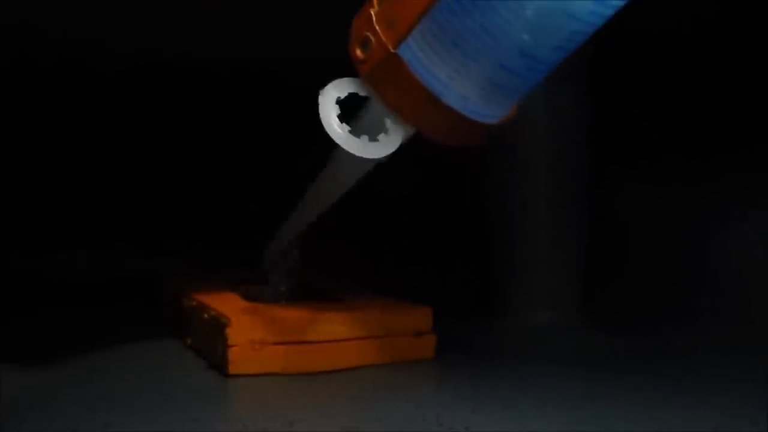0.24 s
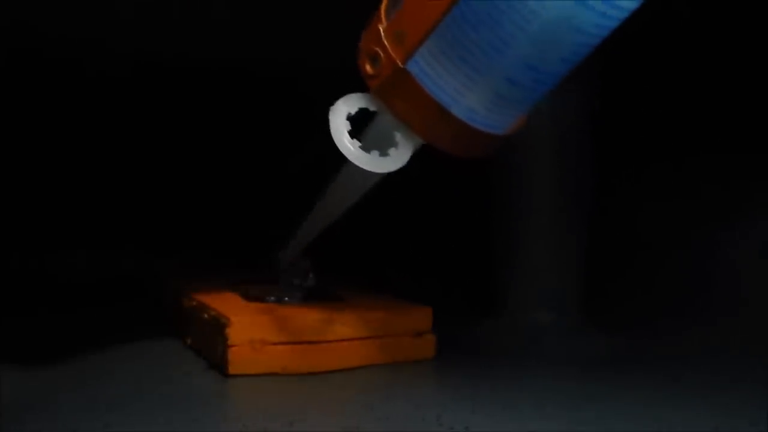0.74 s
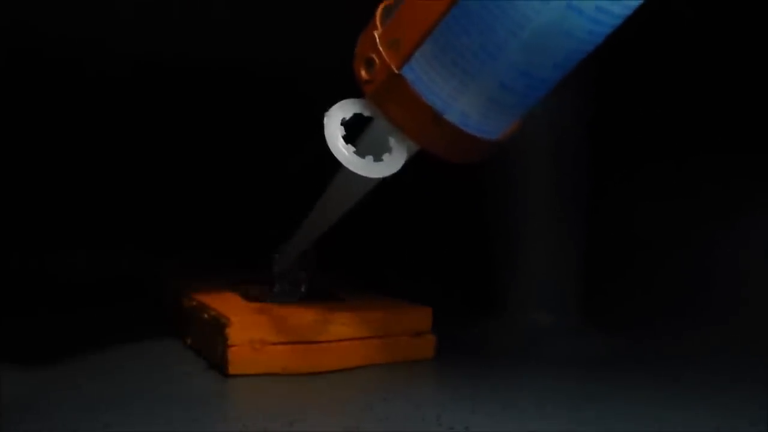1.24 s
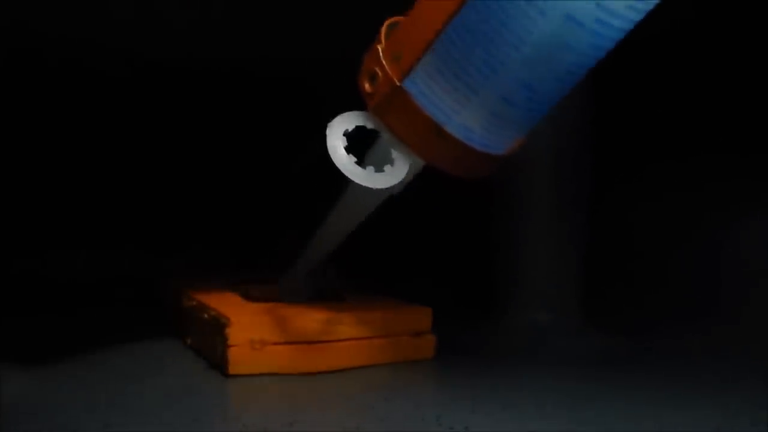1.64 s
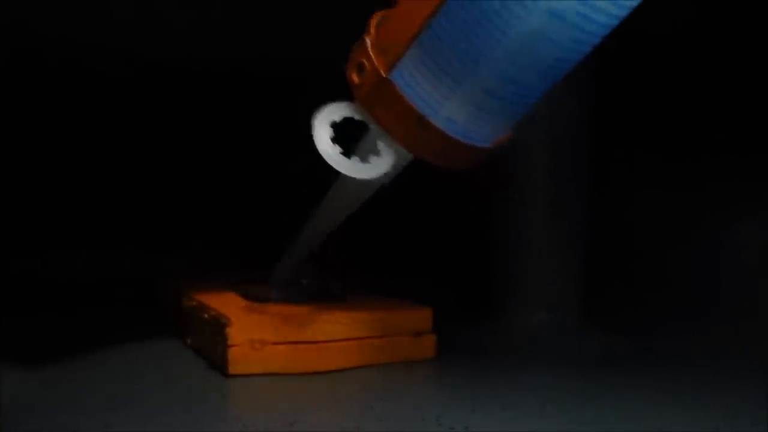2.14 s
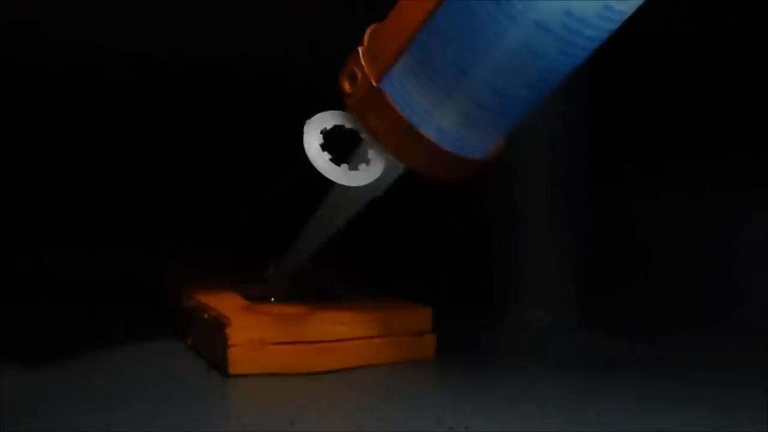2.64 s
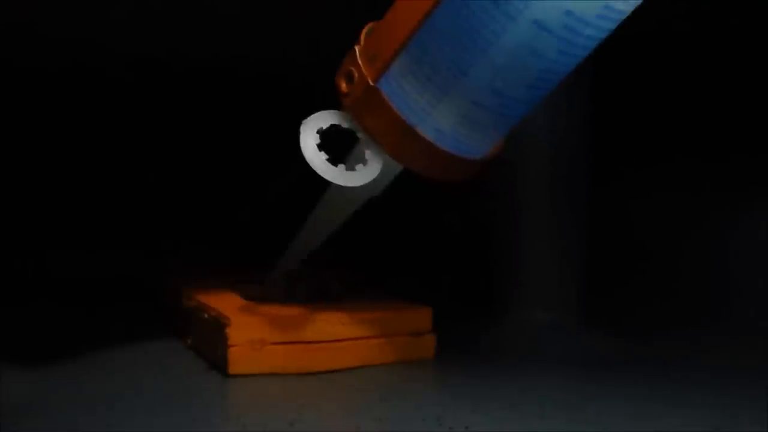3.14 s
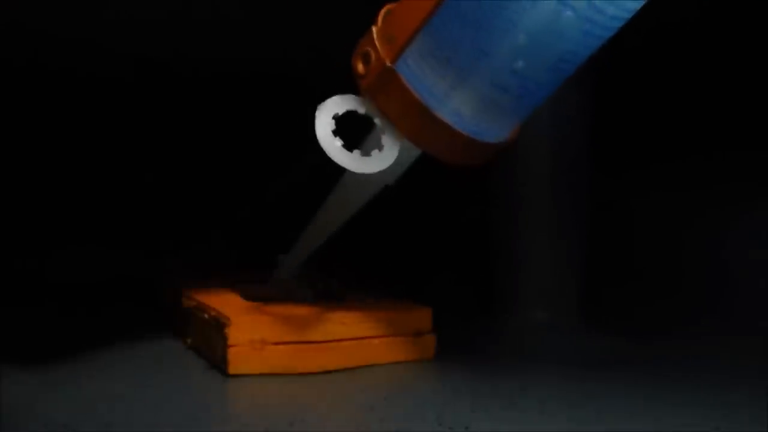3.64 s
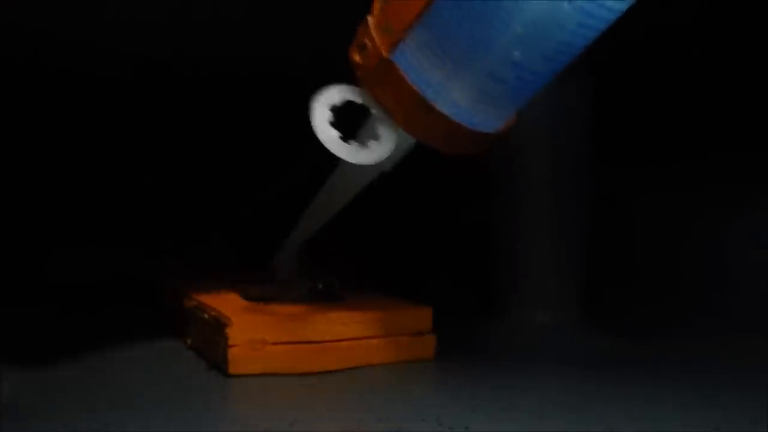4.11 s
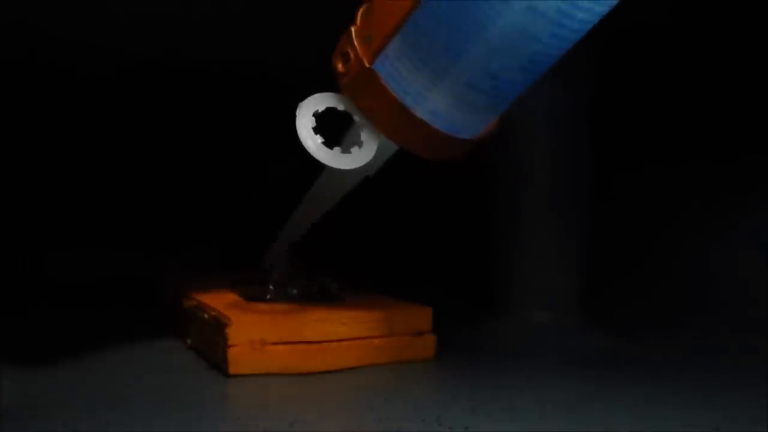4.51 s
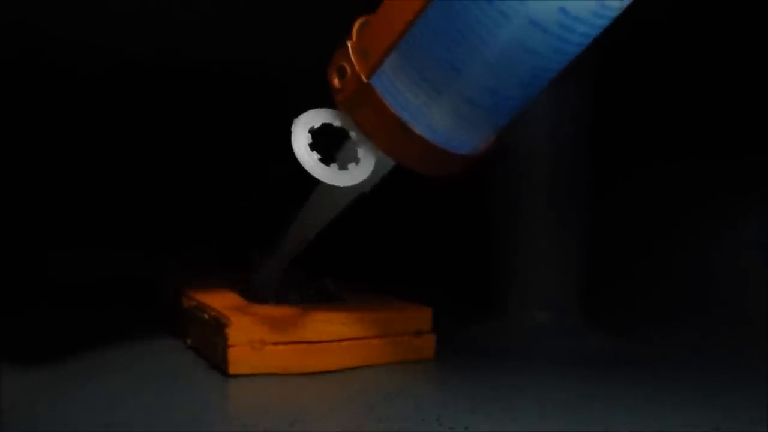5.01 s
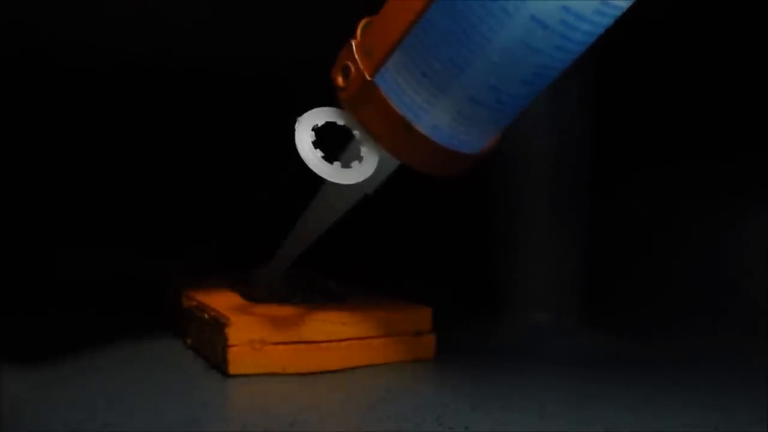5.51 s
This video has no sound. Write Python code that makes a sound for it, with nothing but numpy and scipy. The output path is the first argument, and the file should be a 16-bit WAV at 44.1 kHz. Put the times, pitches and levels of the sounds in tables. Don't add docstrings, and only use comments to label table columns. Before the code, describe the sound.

A caulking gun is handled on a workbench: a bright metallic snap, low thumps, rattling scrapes and heavy knocks over faint hiss.

```python
import sys
import numpy as np
from scipy import signal
from scipy.io import wavfile
from scipy.ndimage import uniform_filter1d

SR = 44100
rng = np.random.default_rng(int(sys.argv[2]) if len(sys.argv) > 2 else 0)


def nominal_scale(level):
    x = np.asarray(level, float) / 20
    return 10 ** x


def dump_mix(stems):
    frames = np.atleast_2d(stems).T
    limited = np.clip(frames, -1, 1)
    pcm = np.round(limited * 32767).astype(np.int16)
    wavfile.write(sys.argv[1], SR, pcm)


N = 254000

# t/s, top level/dB, then legs, frame and small parts over the top/dB
KNOCKS = [(1.6244, -3.5, -5, -3, -6.5), (1.638, -15, -5, 7.5, -5), (2.567, -43, -11, -23, -12),
          (3.431, -14, -1, -15, -13), (3.453, -16.5, -10, -21, -13), (3.469, -26, -5, 16.5, 2),
          (3.494, -19, -30, -13, -8.5), (3.6145, -21.5, -29, 11.5, 5.5), (3.626, -18.5, -5, 6, -10),
          (4.026, -24.5, 4, -2, -10.5), (4.103, -28, 5, -4, -6.5), (4.519, -49, 11, 13, 10),
          (5.601, -33, -16, 7, -4)]
# t/s, top level/dB, gun frame over the top/dB, push length/s
NUDGES = [(0.048, -32, -11, 0.01), (0.193, -17.5, -13, .018), (0.259, -28.5, -8, 0.0081),
          (0.334, -33, -15.5, .008), (0.569, -31.5, -9.5, 0.1), (0.648, -34.5, -23, 0.0081),
          (0.714, -36.5, -21, .009), (1.549, -26.5, -10, 0.043), (2.554, -32, -4, 0.012),
          (2.589, -56, -3, .007), (3.886, -21.5, -8, 0.0034), (3.898, -26.5, -8, 0.0084),
          (4.155, -23.5, -7, .012), (4.238, -16, -12, 0.0098), (4.269, -30.5, -14, .015),
          (4.418, -26.5, -7.5, 0.013), (4.449, -27, -17, .012), (4.488, -30, -10.5, .013),
          (4.733, -25, -6, 0.011), (4.878, -40, -33, .015)]
# t/s, top level/dB, gun frame over the top/dB, push length/s
LEANS = [
    (-.025, -31.5, 1, 0.026),
    (1.585, -24.5, -5.5, 0.033),
    (2.06, -31.5, -31, 0.017),
    (2.786, -25.5, -13, 0.017),
    (4.198, -19, -9.5, 0.028),
    (4.335, -29, -16, .005),
]
# t/s, frame level/dB, small parts over the frame/dB, push length/s
GRIPS = [
    (1.981, -23.5, -2.5, .022),
    (4.042, -18, -15, 0.0103),
    (5.453, -29.5, -13, 0.02),
    (5.489, -27.5, -1.5, 0.0091),
    (5.683, -23, -5, 0.0054),
    (5.711, -22, 0.5, 0.011),
]
# t/s, parts level/dB, frame over the parts/dB, push length/s
SCRAPES = [
    (0.174, -31, -10, 0.01),
    (1.334, -39.5, -21, 0.0036),
    (2, -22.5, -4.5, 0.016),
    (5.55, -50, -4, .021),
    (5.601, -24, -5.5, 0.014),
    (5.622, -33.5, 3, 0.014),
    (5.65, -31, -17, 0.053),
]

# f/Hz, level/dB, time to fall 60 dB/s
LEG_MODES = [(54.35, -1, 0.72), (92.1, 0, 0.53), (47.1, -13, .5), (102.4, -10, 0.14), (70.64, -7, 0.73)]
TOP_MODES = [(166.1, 3, 0.19), (155.6, -7.5, 0.69), (152, -6, 0.035), (198.8, -5.5, 0.352),
             (232, -5.5, 0.076)]
FRAME_MODES = [(420, -2, 0.16), (429, -15.5, 0.33), (331.4, -15.5, 0.29), (366, -6.5, 0.079),
               (522, -1.5, 0.066)]
PART_MODES = [(595, -27, 0.15), (632.8, 4, 0.29), (738, -6, 0.49), (750, -24, 0.22), (866, -5, 0.15),
              (1018, -9, 0.34), (1099, 2.5, 0.041), (1106, -14, 0.7), (1211, -10.5, 0.28),
              (1375, -24, 0.22), (2253, -19.5, 0.38)]
# f/Hz, level per Hz/dB
RATTLE_COLOUR = [(400, -10), (520, 18.5), (1250, 0), (1700, -9), (2300, -3), (2900, -19.5), (4000, -30),
                 (8000, -63)]
# f/Hz, time to fall 60 dB/s
RATTLE_FADE = [(500, 0.21), (1300, 0.45), (2500, 0.18), (5000, .03)]

# t/s, level/dB
CRACKS = [
    (1.6243, -27.5),
    (3.484, -37),
    (3.612, -53),
    (4.514, -46),
    (5.616, -42),
    (5.701, -35),
]

# t/s, level/dB, treble tilt above 5.5 kHz/dB per octave
SNAPS = [
    (-.06, -26.5, -18),
    (.177, -50, -10),
    (1.729, -43.5, -1),
    (3.6691, -9.5, -1),
]
# f/Hz, level per Hz/dB
SNAP_COLOUR = [(1180, -47), (2000, -27.5), (2530, -20), (2830, -33), (3140, -17), (3550, -22), (5540, -6),
               (6470, -16), (8190, -10), (9010, -17), (10100, -8), (11600, -6), (13300, -0.5), (15200, -9),
               (16000, -40.5)]
# f/Hz, level/dB, time to fall 60 dB/s
PLATE_MODES = [(5470, 24, 0.013), (6050, -38, .02), (7080, 19, 0.011), (10800, 2, 0.027),
               (13200, 19, 0.031)]
# f/Hz, time to fall 60 dB/s
SHOP_FADE = [(2500, 0.56), (5500, 0.47), (8000, 0.36), (12000, 0.21), (15000, 0.23)]

# f/Hz, level per Hz/dB
AIR_COLOUR = [(15, -66), (25, -21.5), (120, 2), (166, 1), (309, -1), (363, -5.5), (416, -2.5), (796, -8.5),
              (2160, -17.5), (2910, -20.5), (3820, -22.5), (13200, -32), (16000, -38.5)]

# threshold level/dB, share of the excess taken off, fall time/s, recovery/dB per s
DUCKS = [
    (-16.5, 1.032, 0.02, 41.5),
    (-37.5, 0.4, 0.82, 59),
]
# f/Hz, width/Hz
NOTCHES = [(2890, 190), (7860, 93), (11690, 1320), (15530, 60)]


def pushes():
    # time, top dB, then legs, frame and parts in dB over the top, push length
    rows = []
    for s, top_db, frame_db, length in NUDGES:
        rows.append((s, top_db, -13.5, frame_db, frame_db - 4, length))
    for s, top_db, frame_db, length in LEANS:
        rows.append((s, top_db, -3.5, frame_db, frame_db - 4, length))
    top_db = -3
    for s, frame_db, parts_db, length in GRIPS:
        rows.append((s, frame_db + top_db, -10, -top_db, parts_db - top_db, length))
    for s, parts_db, frame_db, length in SCRAPES:
        rows.append((s, parts_db + top_db, -13, frame_db - top_db, -top_db, length))
    return sorted(rows)


def bench(events, grit_db, swell):
    t = np.arange(SR * 3 // 4) / SR
    top = below(above(ring(TOP_MODES, t), 85), 260)
    legs = ring(LEG_MODES, t) * (1 - np.exp(-(t / 0.011) ** 2))
    frame = below(above(ring(FRAME_MODES, t), 236), 450)
    parts = peaked(below(above(ring(PART_MODES, t), 283), 3300))

    hz = np.fft.rfftfreq(256, 1 / SR)[:, None]
    frame_s = np.arange(120) * 64 / SR
    rattle_db = read(RATTLE_COLOUR, hz) - 60 * frame_s / read(RATTLE_FADE, hz)
    loosen = 1 - np.exp(-t[:119 * 64] / 0.00024)

    size = (len(events), 6000)
    grit = nominal_scale(grit_db * rng.standard_normal(size))
    slips = rng.standard_normal(size) * grit
    out = np.zeros(N)
    for (s, top_db, *over_db, length), slip in zip(events, slips):
        u = t[:6000] / max(length, .001)
        force = slip * u ** swell * np.exp(-u)
        rattle = peaked(below(shaped(rattle_db, 256) * loosen, 3600))
        small = parts.copy()
        add(small, 0, nominal_scale(0.5) * rattle)
        levels = nominal_scale(top_db + np.array([0, *over_db]))
        for level, body in zip(levels, [top, legs, frame, small]):
            add(out, s, level * peaked(signal.fftconvolve(force, body)))
    return out


def cracks():
    t = np.arange(1500) / SR
    puff_s = 0.0043
    out = np.zeros(N)
    for s, db in CRACKS:
        noise = rng.standard_normal(1500)
        puff = noise * t / puff_s * np.exp(-(t / puff_s) ** 2)
        add(out, s, nominal_scale(db) * peaked(below(above(puff, 1250), 1600)))
    return out


def snaps():
    t = np.arange(900) / SR
    hz = np.fft.rfftfreq(256, 1 / SR)[:, None]
    frame_s = np.arange(600) * 64 / SR
    out = np.zeros(N)
    for s, db, tilt_db in SNAPS:
        octaves = np.log2(np.maximum(hz / 5500, 1))
        colour_db = read(SNAP_COLOUR, hz) + tilt_db * octaves
        crack = shaped(colour_db + np.zeros(20), 256)[:900] * np.exp(-t / 0.0045)
        direct = peaked(peaked(crack) + 0.42 * peaked(ring(PLATE_MODES, t)))
        tail = peaked(shaped(colour_db - 60 * frame_s / read(SHOP_FADE, hz), 256))
        tail = tail * (1 - np.exp(-np.arange(len(tail)) / SR / 0.0066))
        add(out, s, nominal_scale(db) * direct)
        add(out, s + 0.002, nominal_scale(db - 27) * direct)
        add(out, s, nominal_scale(db - 6) * tail)
    return out


def air():
    frames = N // 256 + 5
    hz = np.fft.rfftfreq(1024, 1 / SR)[:, None]
    patches = rng.standard_normal((frames, 513)).T
    patches = uniform_filter1d(patches, 8, 0)
    patches = uniform_filter1d(patches, 12, 1)
    hiss = shaped(read(AIR_COLOUR, hz) + 1.5 * evened(patches), 1024)[:N]

    t = np.arange(SR // 2) / SR
    bodies = ring(TOP_MODES + FRAME_MODES, t) + 0.34 * ring(PART_MODES, t)
    rumble = signal.fftconvolve(rng.standard_normal(N), bodies)[:N]
    return nominal_scale(-41) * evened(hiss) + nominal_scale(-48.5) * evened(rumble)


def ring(modes, t):
    return sum(nominal_scale(db - 60 * t / t60) * np.sin(2 * np.pi * hz * t) for hz, db, t60 in modes)


def shaped(field_db, size):
    a, b = rng.standard_normal(field_db.T.shape + (2,)).T
    spectra = (a + 1j * b) * nominal_scale(field_db)
    return signal.istft(spectra, nperseg=size, noverlap=size * 3 // 4)[1]


def above(x, hz):
    return signal.sosfilt(signal.butter(3, hz, "high", fs=SR, output="sos"), x)


def below(x, hz):
    return signal.sosfilt(signal.butter(2, hz, fs=SR, output="sos"), x)


def peaked(x):
    return x / np.sqrt(uniform_filter1d(x ** 2, size=441).max() + 1e-20)


def evened(x):
    return x / np.sqrt(np.mean(x ** 2) + 1e-20)


def read(points, hz):
    f, value = np.transpose(points)
    return np.interp(np.log(hz + 1), np.log(f + 1), value)


def add(mix, s, sound):
    at = round(s * SR)
    sound = sound[max(-at, 0):]
    part = mix[max(at, 0):][:len(sound)]
    part += sound[:len(part)]


def scene():
    knocks = [(*row, 0.0081) for row in KNOCKS]
    handling = bench(pushes(), 2.93, 0.81)
    blows = bench(knocks, 2.9, 0.037)
    return (handling + blows + cracks() + snaps() + air())[None]


def ducked(x):
    power = uniform_filter1d(x[0] ** 2, size=1323, origin=661)
    power_db = 10 * np.log10(abs(power) + 1e-12)
    gain_db = 0
    for threshold_db, share, fall_s, pace in DUCKS:
        climb = np.arange(N) * pace / SR
        cut_db = share * np.maximum(power_db - threshold_db, 0)
        held_db = np.maximum.accumulate(cut_db + climb) - climb
        keep = np.exp(-1 / (fall_s * SR))
        gain_db = gain_db - signal.lfilter([1 - keep], [1, -keep], held_db)
    return x * nominal_scale(gain_db)


def roll_off(x):
    return signal.sosfilt(signal.butter(12, 16340, fs=SR, output="sos"), x)


def record(dry):
    x = ducked(above(dry, 39.7))
    for hz, width in NOTCHES:
        x = signal.lfilter(*signal.iirnotch(hz, hz / width, SR), x)
    treble_edge = signal.firwin(511, 15720, window=("kaiser", 9), fs=SR)
    x = signal.oaconvolve(x, treble_edge[None], "same")
    x = x / (1 + abs(x / .99) ** 10) ** (1 / 10)
    return roll_off(x)


dry = scene()
out = record(dry)
dump_mix(out)
```